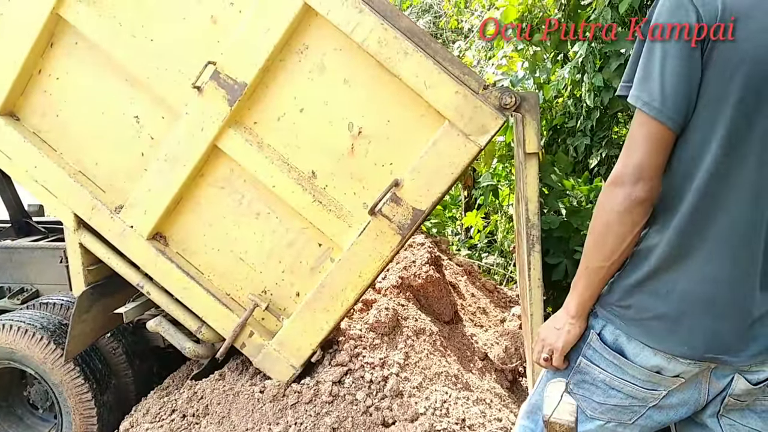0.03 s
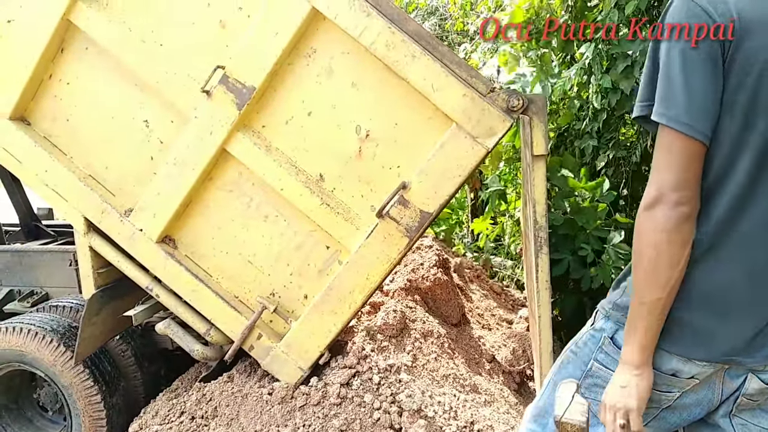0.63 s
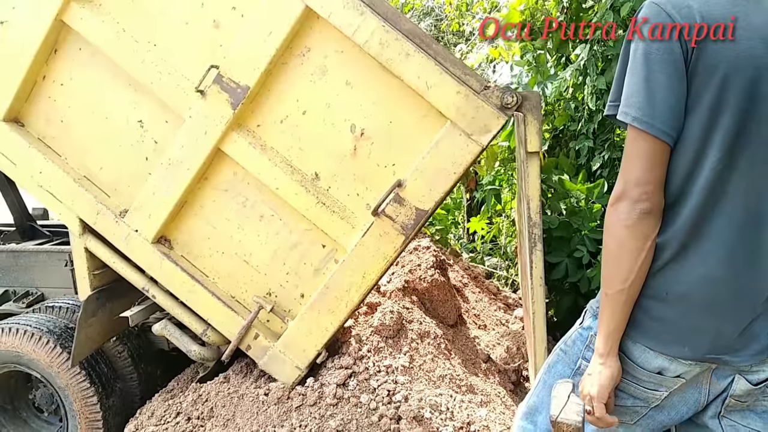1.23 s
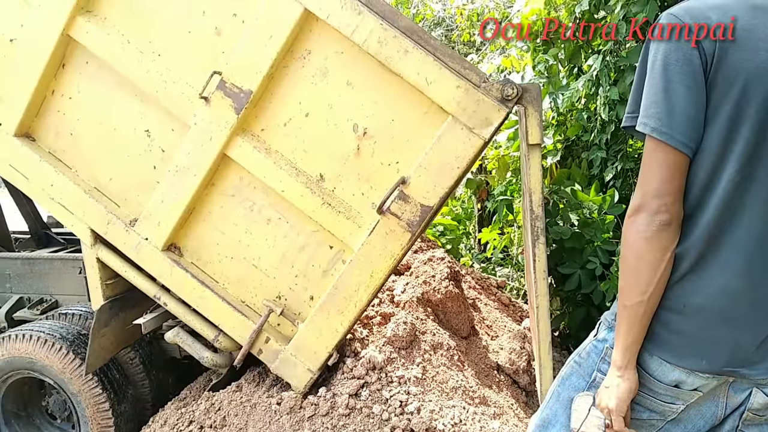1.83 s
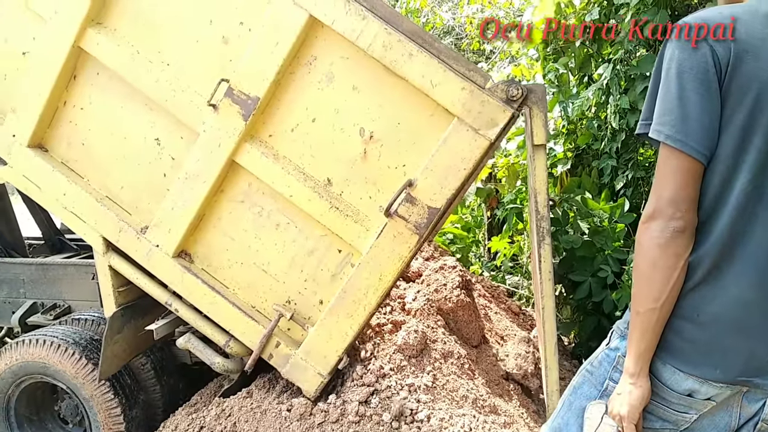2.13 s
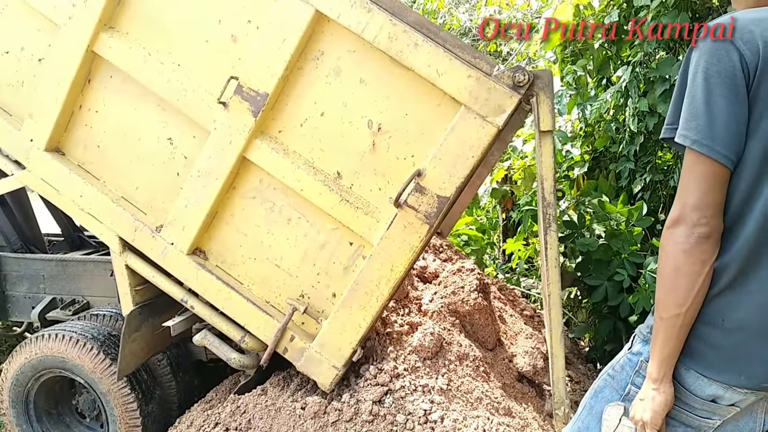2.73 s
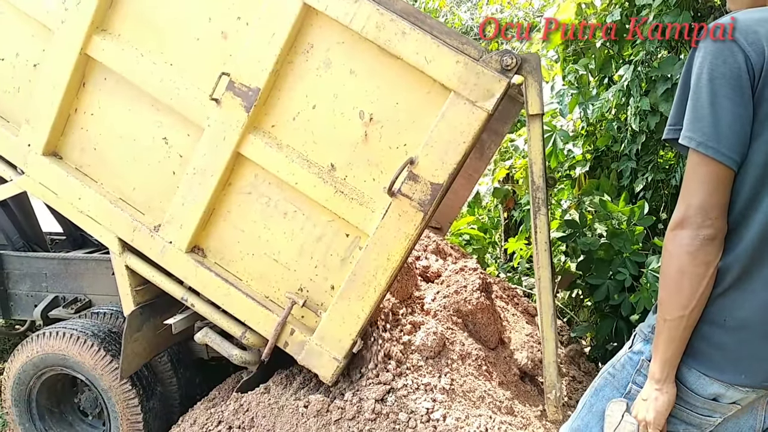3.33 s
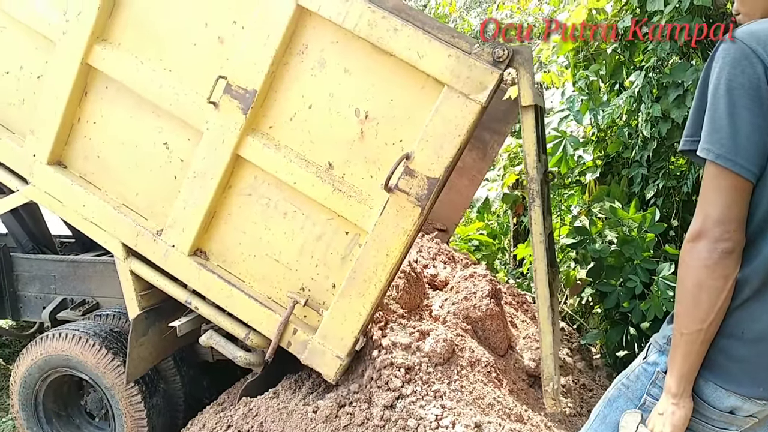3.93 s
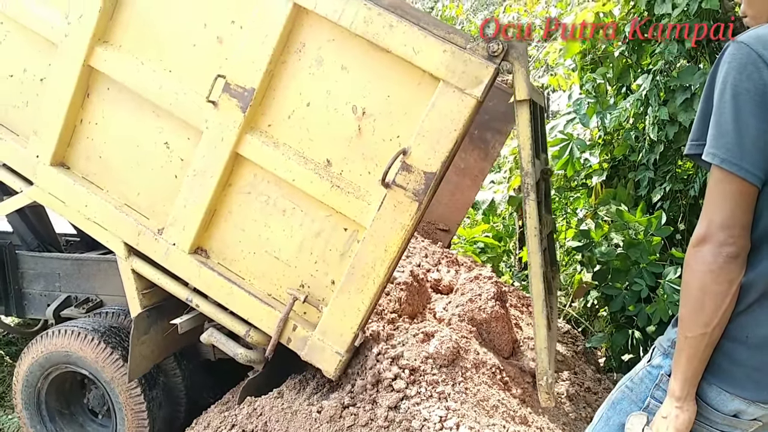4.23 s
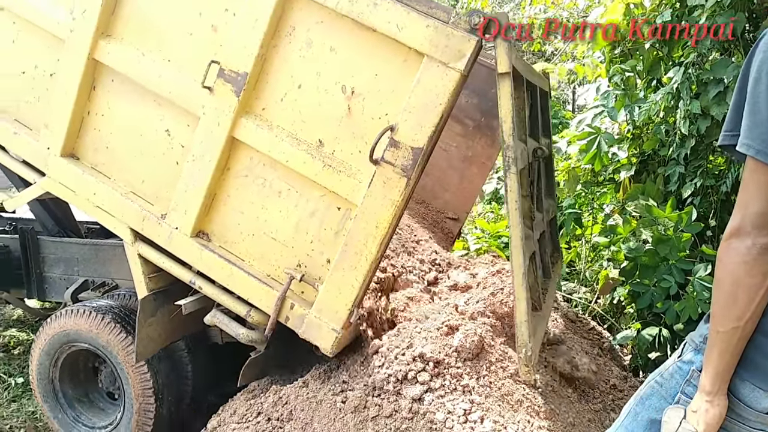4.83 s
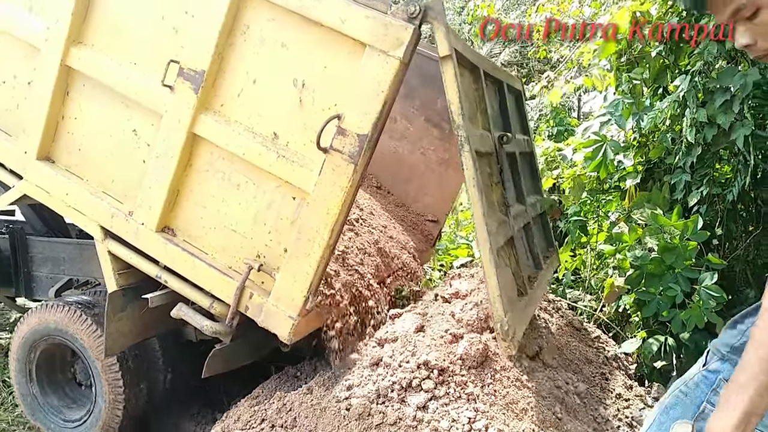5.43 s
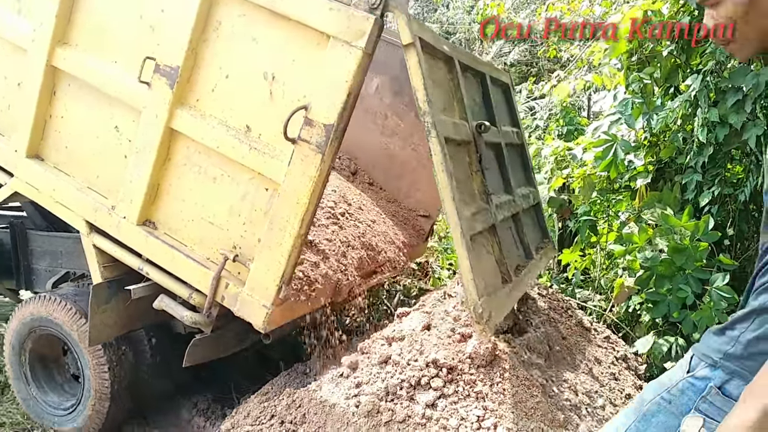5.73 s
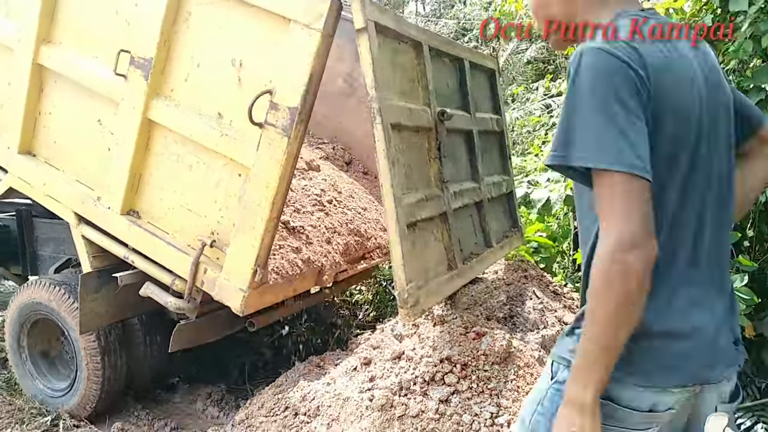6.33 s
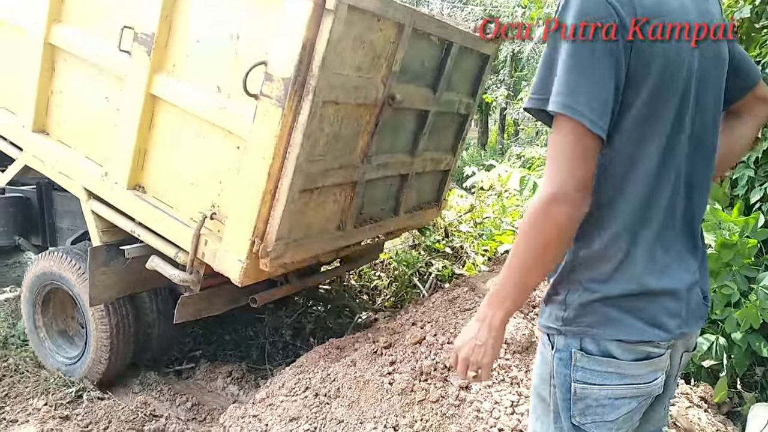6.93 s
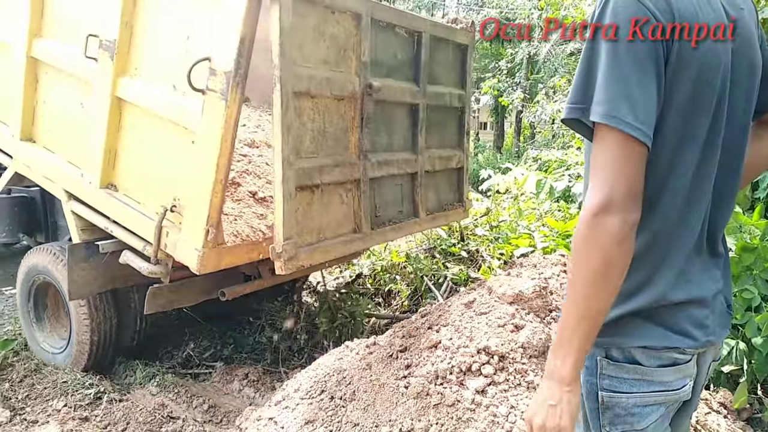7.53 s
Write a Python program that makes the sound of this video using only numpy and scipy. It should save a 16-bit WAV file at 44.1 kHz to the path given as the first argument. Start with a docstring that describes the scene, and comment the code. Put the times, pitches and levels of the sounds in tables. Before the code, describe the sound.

A diesel dump truck idles a few metres to the right with a steady clatter and small metallic clacks. The engine revs, and soil hisses off the raised bed with tumbling clods and hollow scrapes. The revs dip, then climb again as the truck pulls away. Its steel tailgate drags over the heap, booms and bangs shut, ending in a brief hinge groan. Soft outdoor air lies underneath.

```python
"""A four-cylinder diesel clatters at idle a few metres to the right, then revs twice to pull away.
Each firing knocks on the covers, rings the block and puffs the exhaust. It is a tipper leaving its heap:
soil hisses off the raised bed and clods tumble after it. The tailgate drags over the heap, booms,
swings shut with a bang and groans on its hinges, all over a soft outdoor background."""
import sys
import numpy as np
from scipy import signal
from scipy.fft import rfft, irfft
from scipy.io import wavfile
from scipy.ndimage import uniform_filter1d

SR = 44100
rng = np.random.default_rng(int(sys.argv[2]) if len(sys.argv) > 2 else 0)


def master(y):
    """Save y as 16-bit WAV."""
    cut = np.clip(np.atleast_2d(y).T, -1, 1)
    pcm = np.round(cut * 32767)  # scale
    wavfile.write(sys.argv[1], SR, pcm.astype(np.int16))


N = 339129
TIME = np.arange(N) / SR
FREQ = np.maximum(np.arange(N // 2 + 1) * SR / N, 1)

# engine speed (time [s], firing rate [Hz])
FIRING_RATE = [(0.0, 19.43), (0.5, 19.52), (2.5, 19.55), (3.0, 21.54), (3.15, 24.56), (3.45, 33.58),
               (3.7, 36.03), (4.25, 37.39), (4.75, 35.89), (5.0, 32.66), (5.6, 28.44), (6.03, 24.99),
               (6.45, 33.05), (6.9, 38.07), (7.2, 35.13), (7.45, 30.05), (7.69, 26.82)]
# spectrum of a hard knock (frequency [Hz], level [dB])
KNOCK_SPECTRUM = [(300, -9.5), (700, 1), (1100, -3), (1600, 3), (2100, 0), (2700, -7), (3700, -6.5),
                  (5500, -7.5), (7000, -11), (9500, -10.5), (11000, -15.5), (13000, -12), (15500, -49)]
# modes of the steel bed and gate (frequency [Hz], level [dB], t60 [s])
BED_MODES = [(73.7, -25, 0.73), (112, -11.5, 0.33), (120.8, 2, 0.18), (150, 1.5, 0.076), (213.4, 1, 0.29),
             (276, -3.5, 0.22), (350.5, -6.5, 0.36), (367, -6, 0.15), (424, -10, 0.18), (546, -9, 0.44),
             (577, -12, 0.4), (625, -19, 0.25), (724, -4, 0.18), (805, -19, 0.18)]


def diesel(phase):
    """Firings knock on the covers, ring the block and shake the chassis into a drone."""
    # block resonances (frequency [Hz], width [Hz], level [dB])
    block_modes = [(590, 150, 2.5), (673, 82, 1.5), (756, 30, 5.5)]
    # chassis drone (frequency [Hz], level [dB])
    drone_spectrum = [(60, -16), (120, -20), (185, 4.5), (250, 1), (320, -4.5), (420, -37), (700, -34)]
    grit = rfft(colour(noise() * undb(4.3 * walk(900)), KNOCK_SPECTRUM))
    below = lambda hz: 1 / (1 + (FREQ / hz) ** 8)
    clack = irfft(grit * below(1760), N)
    clack *= knocks(phase, decay_s=0.011, rise_s=0.0015, floor=0.16, spread_db=2.0)
    clatter = irfft(grit * (below(4630) - below(2160)), N)
    clatter *= knocks(phase, decay_s=0.016, rise_s=0.0027, floor=0.12, spread_db=3.3)
    tick = irfft(grit * (1 - below(5200)), N)
    tick *= knocks(phase, decay_s=0.013, rise_s=0.0014, floor=0.08, spread_db=4.5)
    knock = (clack + clatter + tick) * effort(-52, throttle_db=14.5, octave_db=-0.8, away_db_per_s=3)
    block = sum(undb(db) * resonance(hz, width) for hz, width, db in block_modes) * resonance(670, 460)
    blows = noise() * bursts(phase, decay_s=0.03, rise_s=0.00044, floor=0.26, spread_db=3.5)
    ring = shaped(blows, block) * effort(-60, throttle_db=20, octave_db=-1, away_db_per_s=1.9)
    shake = noise() * bursts(phase, decay_s=0.0044, rise_s=0.00031, floor=0.47, spread_db=3.0)
    drone = colour(shake, drone_spectrum)
    drone *= effort(-62, throttle_db=18.5, octave_db=5.5, away_db_per_s=0.5)
    return covers(knock, t60=0.12, tail_db=-3) + ring + drone


def injection_pings(phase, hz=2050, spread=0.09):
    """Every firing rings the injection gear at a slightly different pitch."""
    firing = phase.astype(int)
    pitch = hz * np.exp(spread * rng.standard_normal(firing.max() + 1))[firing]
    ring = (narrow(width_hz=150) * np.exp(1j * angle(pitch))).real
    strokes = knocks(phase, decay_s=0.013, rise_s=0.0012, floor=0.05, spread_db=4.0)
    return ring * strokes * effort(-62.5, throttle_db=25.5, octave_db=-6.5, away_db_per_s=4)


def exhaust(phase, silencer_hz=57.3, silencer_q=9.5):
    """Firing harmonics swell as they cross the silencer's resonance and boom as the revs climb."""
    # exhaust note (multiple of the firing rate, level [dB])
    harmonics = [(1, -15), (2, 4.5), (3, 12), (4, 10.5), (5, 11), (6, -14)]
    rate, note = curve(FIRING_RATE), 0
    for k, db in harmonics:
        tuning = k * rate / silencer_hz
        pipe = 1 / np.hypot(1, (tuning - 1 / tuning) * silencer_q)
        gain = undb(db + 3.1 * walk(6.7) + 4.6 * walk(45))
        note += gain * pipe * np.sin(2 * np.pi * (k * phase + rng.random() + 0.02 * k * walk(14)))
    climb_hz_per_s = uniform_filter1d(np.maximum(np.gradient(rate) * SR, 0), size=SR // 10)
    note *= undb(0.244 * climb_hz_per_s)
    return ports(note * effort(-71.5, throttle_db=22, octave_db=19, away_db_per_s=0.9))


def idle_hum(phase):
    """A few clear tones hum along with the idle, slightly roughened by the firings."""
    # hum tones (frequency [Hz], level [dB])
    partials = [(78, -71), (103.8, -51), (156.5, -70), (182, -57), (207.5, -64.5), (312.5, -64)]
    # the hum sinks away on the first rev (time [s], level [dB])
    fade = [(0, -6), (.13, -1), (.3, -7), (.55, -6), (.8, 0), (1.9, -3.5), (2.7, -12), (3.05, -5),
            (3.5, -30)]
    drift = 1 + 0.0042 * walk(11)
    tones = sum(undb(db + 1.74 * walk(8.74)) * np.sin(angle(hz * (drift + 0.004 * walk(35))))
                for hz, db in partials)
    roughness = bursts(phase, decay_s=0.029, rise_s=0.0056, floor=1.0, spread_db=-1.0)
    return ports(np.sqrt(2) * tones * undb(curve(fade)) * roughness)


def bursts(phase, decay_s, rise_s, floor, spread_db):
    """Envelope with a burst at every firing, over a floor: the steady churn of the gears."""
    # the four cylinders in firing order (strength [dB])
    cylinders = [1.4, 0.8, 2.2, 2.5]
    firing = phase.astype(int)
    age = phase % 1 / curve(FIRING_RATE)
    uneven_db = spread_db * rng.standard_normal(firing.max() + 1)[firing]
    strength = undb(np.array(cylinders)[firing % len(cylinders)] + uneven_db)
    burst = strength * (1 - np.exp(-age / rise_s)) * np.exp(-age / decay_s)
    power = burst ** 2 + floor ** 2
    return np.sqrt(power / uniform_filter1d(power, size=SR // 4))


def knocks(phase, decay_s, rise_s, floor, spread_db):
    """Envelope with three strokes a firing: injection tick, combustion knock, faint valve seating."""
    # (place in the firing [0-1], level [dB])
    strokes = [(0, -2.5), (.11, -2), (.55, -8.5)]
    power = sum((undb(db) * bursts(phase - place, decay_s, rise_s, floor, spread_db)) ** 2
                for place, db in strokes)
    return unit(np.sqrt(power))


def effort(idle_db, throttle_db, octave_db, away_db_per_s, idle_hz=19.5, pulls_away_s=4.32):
    """Gain of an engine part: it follows throttle and revs, and fades as the truck rolls off."""
    # two pushes of the driver's foot (time [s], throttle [0-1])
    pedal = [(2.55, 0.02), (2.8, 0.2), (3.05, 0.29), (3.24, 0.83), (3.36, 0.68), (3.6, 0.58), (4.1, 0.7),
             (4.62, 0.84), (4.85, 0.38), (6.05, 0.4), (6.17, 0.63), (6.25, 0.71), (6.38, 0.68), (6.9, 0.94),
             (7.2, 0.73), (7.4, 0.5), (7.69, 0.43)]
    octaves = np.log2(curve(FIRING_RATE) / idle_hz)
    rolling_s = np.maximum(TIME - pulls_away_s, 0)
    return undb(idle_db + throttle_db * curve(pedal) + octave_db * octaves - away_db_per_s * rolling_s)


def covers(x, t60, tail_db):
    """Engine covers ring at a few clear modes over a short, dense metallic tail."""
    # (frequency [Hz], width [Hz], level [dB])
    cover_modes = [(1310, 143, -0.5), (1973, 60, 1), (2200, 46, -18.5), (2327, 36, 5), (3420, 110, -2),
                   (3940, 170, -0.5)]
    age = TIME[:SR // 10]
    tail = rng.standard_normal((3, len(age))) * undb(-60 * age / t60)
    tail /= np.sqrt(np.sum(tail[0] ** 2))
    dense = 1 + undb(tail_db) * rfft(tail, N) * np.minimum(FREQ / 1200, 1)
    clear = 1 + sum(undb(db) * resonance(hz, width) for hz, width, db in cover_modes)
    return irfft(rfft(x) * dense * clear, N) / np.hypot(1, undb(tail_db))


def metal_clacks():
    """Engine parts and latches clack hard and ring the covers."""
    # (time [s], level [dB], centre [Hz], t60 [s])
    clacks = [(.008, -41, 2290, 0.051), (.105, -37, 2266, 0.036), (.155, -46.5, 1583, 0.14),
              (.310, -42, 1930, 0.041), (.360, -44, 2040, 0.04), (.515, -44.5, 3500, 0.095),
              (.567, -43, 1600, 0.14), (.722, -38.5, 1970, 0.032), (.825, -47, 3560, 0.03),
              (.926, -43, 2098, 0.036), (.975, -44.5, 2248, 0.27), (1.132, -41, 2060, 0.045),
              (1.233, -43, 2460, .045), (1.335, -45.5, 1896, 0.043), (1.544, -43.5, 2200, 0.077),
              (1.692, -41.5, 2130, 0.029), (1.747, -41, 1996, 0.036), (2.153, -46.5, 2190, 0.048),
              (2.207, -42.5, 1620, 0.081), (2.358, -43, 1870, 0.054), (2.5625, -41.5, 2040, 0.098),
              (2.613, -37, 1960, 0.091), (2.712, -39.5, 2050, 0.039), (2.761, -44.5, 1950, 0.066),
              (2.952, -46, 1930, 0.086), (3.171, -35, 1720, .045), (3.210, -43, 2700, 0.031),
              (3.246, -42, 2370, 0.032), (3.284, -39.5, 2200, 0.049), (3.317, -40, 2200, 0.032),
              (3.444, -37.5, 2300, 0.026), (3.672, -36, 1910, 0.04), (3.755, -34.5, 1880, 0.028),
              (4.165, -40.5, 2180, 0.17), (4.355, -36, 2220, 0.029), (4.435, -34, 2100, 0.043),
              (4.547, -35, 2120, 0.035), (4.655, -35, 1690, 0.084), (4.851, -42, 2200, .05),
              (5.485, -44, 2200, 0.044), (5.96, -48, 2110, .06), (6.075, -45.5, 1980, 0.041),
              (6.225, -41.5, 2080, 0.036)]
    return covers(impacts(clacks, q=2.2, crack=1.0, rise_s=0.0007), t60=0.1, tail_db=-4)


def hollow_clunks():
    """Hollow clunks and short, low booms."""
    # (time [s], level [dB], centre [Hz], t60 [s])
    clunks = [(.32, -49.5, 508, 0.13), (.36, -42.5, 780, 0.032), (.455, -46, 748, 0.09),
              (.535, -52, 920, 0.16), (1.0, -49.5, 495, 0.29), (1.39, -46.5, 397, 0.1),
              (1.605, -48, 300, 0.25), (2.02, -43.5, 78, 0.14), (2.092, -47.5, 746, 0.11),
              (2.205, -45, 366, 0.13), (2.302, -41.5, 83.3, .12), (2.395, -45.5, 485, 0.11),
              (2.79, -47.5, 530, 0.16), (3.243, -28.5, 60, 0.29), (3.315, -35.5, 245, 0.34),
              (3.48, -33, 637, 0.12), (3.755, -33, 213, 0.071), (3.916, -35.5, 188, 0.24),
              (4.18, -34, 81.7, 0.13), (4.268, -27.5, 190, 0.19), (4.32, -41, 227, 0.3),
              (4.48, -41, 259, 0.22), (4.585, -38, 190, 0.19), (4.668, -30.5, 900, 0.11),
              (4.87, -42.5, 108, 0.36), (5.27, -43, 500, 0.093), (5.965, -44, 720, .08),
              (6.075, -43.5, 724, .08), (7.07, -32, 68, 0.24), (7.19, -35, 67, 0.26)]
    return impacts(clunks, q=2.83, crack=0.1, rise_s=0.0029)


def bed_thuds():
    """Clods and the gate strike the bed; softer blows reach only its low modes."""
    # (time [s], level [dB], cut-off [Hz])
    blows = [(6.458, -22, 148), (6.473, -18.5, 200), (6.583, -18, 200), (6.613, -13, 130),
             (6.647, -20, 170), (6.71, 1, 108), (6.810, -3, 124), (6.836, -6, 135), (6.877, -16, 210),
             (6.932, -22, 160), (6.977, -11, 410), (7.055, -18, 198), (7.167, -21, 150), (7.285, -30, 186)]
    out = np.zeros(N)
    for start, db, cutoff_hz in blows:
        onset = int(start * SR)
        age, ring = TIME[:min(SR, N - onset)], 0
        for hz, mode_db, t60 in BED_MODES:
            gain = undb(db + mode_db) / np.hypot(1, (hz / cutoff_hz) ** 3)
            pitch = hz * (1 + 0.0053 * rng.standard_normal())
            ring += gain * np.sin(2 * np.pi * pitch * age) * struck(age, 0.0052, t60)
        out[onset:onset + len(age)] += ring
    return ports(out, bearing=0.73)


def gate_hits():
    """The gate strikes stones and then bangs against the bed."""
    # (time [s], level [dB], centre [Hz], t60 [s])
    hits = [(6.388, -33, 760, 0.066), (6.481, -23.5, 620, 0.055), (6.510, -30.5, 760, 0.05),
            (6.582, -29.5, 4700, 0.085), (6.593, -19, 518, 0.062), (6.596, -24.5, 5800, 0.047),
            (6.686, -26.5, 6050, 0.044), (6.688, -30.5, 570, 0.23), (6.738, -28.5, 910, 0.056),
            (6.851, -26, 1310, 0.07), (6.971, -28.5, 1080, 0.14), (6.972, -30, 2900, 0.13),
            (6.976, -23.5, 353, 0.13), (6.981, -25, 4460, 0.053), (7.02, -33, 400, 0.09)]
    return impacts(hits, q=2.1, crack=0.19, rise_s=0.004)


def bed_rumble():
    """The dragging gate shakes the bed, and the rumble gathers in its modes."""
    # (frequency [Hz], level [dB])
    rumble_spectrum = [(25, -32), (50, -8), (75, -0.5), (120, 5), (210, 2), (280, -6.5), (400, -19),
                       (600, -22), (900, -33), (1500, -31), (4000, -68)]
    modes = sum(abs(resonance(hz, width_hz=13)) ** 2 for hz, _, _ in BED_MODES)
    rumble = shaped(colour(noise(), rumble_spectrum), np.sqrt(modes + 0.82 ** 2))
    return ports(rumble * dragging("bed", rise_s=0.0033, t60=0.57), bearing=0.66)


def gate_rattle():
    """The gate chatters against its frame and rings its steel panels."""
    # (frequency [Hz], width [Hz], level [dB])
    panel_modes = [(260, 38, 4.5), (366, 150, 1), (576, 116, -2), (760, 210, -9)]
    panels = sum(undb(db) * resonance(hz, width) ** 2 for hz, width, db in panel_modes)
    return shaped(noise(), panels) * undb(2.8 * walk(90)) * dragging("panels", rise_s=0.0056, t60=0.37)


def dragging(layer, rise_s, t60):
    """Envelope of one layer as the gate drags over the heap in jerks."""
    # (time [s], length [s], bed shudder [dB], gravel [dB], panel rattle [dB])
    jerks = [(6.25, 0.2, -60, -51, -67), (6.449, 0.082, -24.5, -43.5, -36.5),
             (6.571, 0.09, -18.5, -35.5, -36.5), (6.693, 0.285, -21, -42.5, -39),
             (6.969, 0.061, -22, -41.5, -29.5), (7.098, 0.2, -34.5, -71, -61)]
    column = {"bed": 2, "gravel": 3, "panels": 4}[layer]
    return np.sqrt(sum((undb(jerk[column]) * held(*jerk[:2], rise_s, t60)) ** 2 for jerk in jerks))


def hinge_groan(start_s=7.51, hz=158, sag_hz_per_s=40, swell_db_per_s=78):
    """The hinge sticks and slips in a swelling, sagging groan; the gate's sheet rattles along."""
    age = np.maximum(TIME - start_s, 0)
    turn = angle((hz - sag_hz_per_s * age) * (1 + 0.035 * walk(60)))
    sheet = (narrow(width_hz=68)[0] * np.exp(2j * np.pi * 235 * TIME)).real
    groan = np.sqrt(2) * np.sin(turn) + undb(-22) * np.sin(4 * turn) + undb(-7) * sheet
    force = undb(-39 + swell_db_per_s * age) * held(start_s, length_s=0.168, rise_s=0.0017, t60=0.023)
    return ports(groan * force * undb(2 * walk(45)))


def scrapes(phase):
    """Steel drags on earth in hollow, gliding scrapes that growl with the engine's shaking."""
    # (time [s], length [s], centre [Hz], glide [Hz/s], level [dB])
    rubs = [(3.473, 0.2, 641.5, -300, -42.5), (3.677, 0.28, 597, 97, -40), (4.014, 0.21, 605, 50, -45),
            (4.264, 0.11, 629, -150, -40.5), (4.407, 0.095, 608, -2, -46),
            (4.542, 0.11, 481.4, 1896, -37.5), (4.764, 0.041, 596, 578, -43.5), (6.696, 0.054, 609, 0, -39),
            (6.993, 0.2, 577, 12, -47)]
    carrier = 0
    for start, length, hz, glide, db in rubs:
        pitch = hz + glide * np.clip(TIME - start, 0, length)
        carrier += undb(db) * held(start, length, rise_s=0.0052, t60=0.23) * np.exp(1j * angle(pitch))
    hollow = (narrow(width_hz=94) * carrier).real
    return hollow * bursts(phase, decay_s=0.011, rise_s=0.0032, floor=0.58, spread_db=3.5)


def sliding_soil(phase):
    """Soil lets go of the bed in slides of hiss and lumps, each dying to a trickle."""
    # (time [s], level [dB], build-up [s], fall [dB/s])
    slides = [(3.05, -45, 0.045, 50), (3.43, -34, 0.081, 18.5), (4.15, -49.5, 0.045, 3), (6.1, -44, 1, 5.5)]
    # (frequency [Hz], level [dB])
    soil_spectrum = [(500, 6), (1500, 12), (2500, 4), (4000, -5), (5400, -17), (7000, 2.5), (9000, -0.5),
                     (11000, -7), (13000, -2), (15500, -17)]
    flow = np.sqrt(sum((undb(db) * held(start, 0, rise_s, 60 / fall)) ** 2
                       for start, db, rise_s, fall in slides))
    return flow * (undb(-1) * grit_hiss(phase, soil_spectrum) + undb(-3.5) * tumbling_lumps(phase))


def gravel(phase):
    """Gravel hisses under each jerk of the gate."""
    # (frequency [Hz], level [dB])
    gravel_spectrum = [(500, 2), (1500, -6), (4000, -7), (5300, 0), (7000, 0.5), (8500, -8), (10000, -15),
                       (12500, -27), (15500, -42)]
    return grit_hiss(phase, gravel_spectrum) * dragging("gravel", rise_s=0.0018, t60=0.47)


def grit_hiss(phase, spectrum, grains_per_s=4000):
    """Crumbs and grit hiss over the steel, shaken loose in time with the engine."""
    grains = (rng.random(N) < grains_per_s / SR) * undb(4.3 * rng.exponential(size=N).clip(0, 5))
    shaking = knocks(phase, decay_s=0.0067, rise_s=0.0052, floor=0.18, spread_db=4.0)
    return colour(noise() * (grains + 2.4), spectrum) * shaking


def tumbling_lumps(phase, per_band_per_s=70, t60=0.12, tilt_db=-0.55):
    """Lumps tumble as the bed shakes; each size crunches in its own band, small ones a little softer."""
    out, age = 0, TIME[:SR // 20]
    for band, hz in enumerate(np.geomspace(1100, 10000, 7)):
        blows = (rng.random(N) < per_band_per_s / SR) * undb(6.9 * rng.exponential(size=N).clip(0, 2))
        crunch = rng.standard_normal((3, len(age))) * undb(-60 * age / t60)
        crunch = signal.lfilter(*signal.iirpeak(hz, 3.5, fs=SR), crunch)
        out += undb(tilt_db * band) * unit(signal.oaconvolve(blows[None], crunch, axes=1)[:, :N])
    return unit(out) * knocks(phase, decay_s=0.01, rise_s=0.004, floor=0.45, spread_db=2.0)


def breaking_clods():
    """Big clods crumble as they land on the heap."""
    # (time [s], level [dB], centre [Hz], t60 [s])
    clods = [(3.385, -37, 1900, 0.11), (3.412, -38.5, 2070, .05), (3.565, -42, 2200, .06),
             (3.590, -40, 2300, 0.083), (3.617, -37, 1900, 0.062), (3.643, -40, 2300, .06),
             (3.712, -38, 675, 0.043), (3.757, -41, 614, .06), (3.822, -37, 700, 0.042),
             (3.803, -36, 1080, 0.074), (3.885, -41, 2000, .05), (4.003, -47, 1080, .05),
             (4.032, -39, 1900, .05), (4.059, -34, 1500, .05), (4.215, -34, 2100, .05),
             (4.273, -39, 800, 0.05), (4.627, -45, 780, .06)]
    return gritty(impacts(clods, q=2.0, crack=0.2, rise_s=0.0013), grain_db=5, per_s=330)


def treble_spits():
    """Brief spits of high hiss."""
    # (time [s], level [dB], centre [Hz], t60 [s])
    spits = [(.563, -51, 13500, .18), (.96, -46.5, 7500, 0.29), (1.542, -44, 8950, .06),
             (2.35, -52, 13500, .1), (2.612, -51, 9000, 0.1), (3.03, -45, 14000, 0.34),
             (3.171, -39, 9000, 0.11), (3.210, -40.5, 9450, 0.077), (3.472, -41, 7540, 0.048),
             (3.531, -36, 9800, 0.094), (3.560, -41, 8500, .05), (3.586, -34, 8560, 0.1),
             (3.618, -39, 8500, .08), (3.643, -39, 9500, .06), (3.702, -31.5, 9050, 0.045),
             (3.785, -40, 9000, 0.063), (3.815, -40.5, 9000, 0.11), (3.865, -39, 7450, 0.071),
             (4.002, -42, 7200, 0.078), (4.031, -42, 8000, .05), (4.084, -42, 6800, 0.062),
             (4.112, -43, 7800, .05), (4.244, -40, 8300, 0.079), (4.272, -44, 8000, 0.07),
             (4.3, -47, 8000, .06), (4.350, -40, 8400, 0.082), (4.404, -41, 13000, 0.062),
             (4.432, -40.5, 10000, 0.095), (5.53, -47, 5390, 0.2), (6.626, -44, 7800, .06),
             (6.654, -43, 7800, 0.052), (6.711, -41, 8000, 0.055), (6.819, -41, 8500, 0.069),
             (6.846, -39, 8000, 0.12), (6.873, -39, 8000, .06)]
    return gritty(impacts(spits, q=2.15, crack=0.06, rise_s=0.0035), grain_db=1, per_s=900)


def low_flutter(throb_hz=6.9, peak_s=0.37, depth_db=5, limp_db=6):
    """A deep flutter throbs under the engine, strong and weak in turn."""
    low = (narrow(width_hz=14)[0] * np.exp(2j * np.pi * 50 * TIME)).real
    turn = 2 * np.pi * throb_hz * (TIME - peak_s)
    return ports(low * undb(-65.5 + depth_db * np.cos(turn) + limp_db * np.cos(turn / 2)), bearing=0)


def outdoors():
    """A soft, bass-heavy wash of open air."""
    # (frequency [Hz], level [dB])
    air_spectrum = [(25, -35), (50, -19), (85, 10), (130, 0), (200, -2), (420, -11.5), (700, -4),
                    (1100, -21), (2200, -13), (6000, -17), (15000, -25)]
    return colour(noise(), air_spectrum) * undb(-54.5 + 0.13 * walk(5.5))


def ports(x, bearing=1, lag_s=0.0002853):
    """Two microphone ports: sound from the right reaches the left later; scatter differs in each."""
    # sound that arrives scattered (frequency [Hz], share [0-1])
    scatter = [(60, 0.14), (130, 0), (300, 0.02), (600, 0.06), (1100, 0), (2200, 0.85), (8000, 0.66),
               (15000, 1)]
    lag = np.exp(-2j * np.pi * FREQ * lag_s * bearing * np.array([[1], [0]]))
    if x.ndim == 1:
        return irfft(rfft(x) * lag, N)
    paths, share = rfft(x), np.clip(over_freq(scatter), 0, 1)
    return irfft(paths[0] * lag * np.sqrt(1 - share) + paths[1:] * np.sqrt(share), N)


def impacts(table, q, crack, rise_s):
    """Short noise bursts, each ringing around its own pitch, with a share of broad crack."""
    out, broad = np.zeros((3, N)), colour(noise(), KNOCK_SPECTRUM)
    age = TIME[:SR // 4]
    for start, db, hz, t60 in table:
        span = slice(int(start * SR), int(start * SR) + len(age))
        b, a = signal.iirpeak(min(hz, SR / 3), q, fs=SR)
        hiss = rng.standard_normal((3, 2 * len(age)))
        ring = signal.lfilter(b, a, signal.lfilter(b, a, hiss))[:, len(age):]
        envelope = struck(age, rise_s, t60)
        blow = unit((unit(ring) + crack * broad[:, span]) * envelope)
        out[:, span] += blow * np.sqrt(np.mean(envelope ** 2)) * undb(db + 3.5)
    return out


def gritty(x, grain_db, per_s):
    """Break a smooth burst up into grains."""
    return x * unit(undb(grain_db * np.clip(walk(per_s), -2, 2)))


def struck(age, rise_s, t60):
    """Envelope of a blow: quick rise, exponential fall."""
    return (1 - np.exp(-age / rise_s)) * undb(-60 * age / t60)


def held(start_s, length_s, rise_s, t60):
    """Envelope of a rub: attack, hold, release."""
    age = np.maximum(TIME - start_s, 0)
    return (1 - np.exp(-age / rise_s)) * undb(-60 * np.maximum(age - length_s, 0) / t60)


def noise():
    """Three unrelated noises: direct path, left scatter, right scatter."""
    return rng.standard_normal((3, N))


def narrow(width_hz):
    """A narrow band of complex noise around 0 Hz, ready to be carried to any pitch."""
    lowpass = signal.butter(2, width_hz / 2, fs=SR, output="sos")
    return signal.sosfilt(lowpass, noise() + 1j * noise()) / np.sqrt(1.11 * width_hz / SR)


def walk(per_s):
    """Random drift at rms 1."""
    step = int(SR / per_s)
    return unit(uniform_filter1d(np.repeat(rng.standard_normal(N // step + 1), step), step)[:N])


def resonance(hz, width_hz):
    """Response of one resonance, gain 1 at its centre."""
    return 1 / (1 + 1j * (FREQ ** 2 - hz ** 2) / (FREQ * width_hz))


def colour(x, table):
    """Equalise by a (frequency, level) table, at rms 1."""
    return shaped(x, undb(over_freq(table)))


def shaped(x, response):
    """Filter by a frequency response, at rms 1."""
    return unit(irfft(rfft(x) * response, N))


def over_freq(table):
    """A (frequency, value) table on every bin."""
    hz, value = np.transpose(table)
    return np.interp(np.log(FREQ), np.log(hz), value)


def curve(table):
    """A (time, value) table on every sample."""
    return np.interp(TIME, *np.transpose(table))


def angle(hz):
    """Running phase of a moving pitch, in radians."""
    return 2 * np.pi * np.cumsum(hz) / SR


def unit(x):
    """Scale to rms 1."""
    return x / np.sqrt(np.mean(x ** 2))


def undb(db):
    """Decibels to gain."""
    return 10 ** (np.asarray(db) / 20)


def scene():
    """The truck stands to the right; the thuds and rumble of its bed sit nearer the centre."""
    phase = 0.088 + np.cumsum(curve(FIRING_RATE)) / SR  # counted in firings
    air = outdoors()
    hits = metal_clacks() + hollow_clunks() + treble_spits() + breaking_clods() + gate_hits()
    earth = gravel(phase) + sliding_soil(phase) + scrapes(phase)
    engine = diesel(phase) + injection_pings(phase)
    right_side = ports(engine + hits + gate_rattle() + earth + air)
    engine_lows = exhaust(phase) + low_flutter() + idle_hum(phase)
    return right_side + engine_lows + bed_thuds() + bed_rumble() + hinge_groan()


def record(dry, dip_hz=4750, top_hz=15650):
    """The sound has a narrow dip in the treble, and its top is cut off."""
    dip_db = -8 * np.exp(-((FREQ - dip_hz) / 270) ** 2)
    heard = irfft(rfft(dry) * undb(dip_db), N)
    return signal.sosfilt(signal.ellip(10, 0.2, 80, top_hz, fs=SR, output="sos"), heard)


dry = scene()
out = record(dry)
master(out)
```